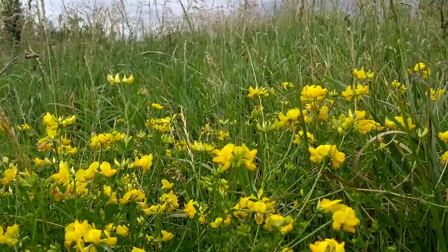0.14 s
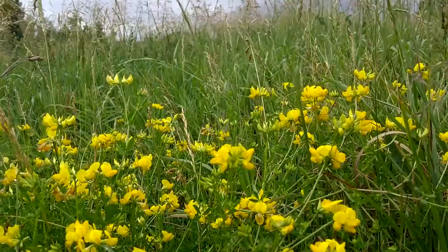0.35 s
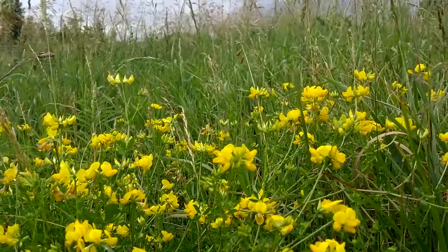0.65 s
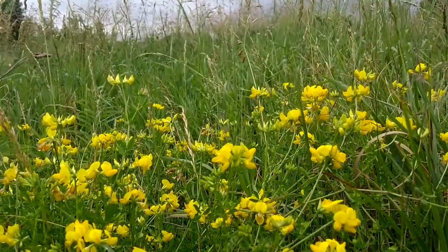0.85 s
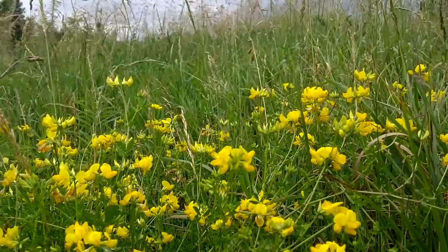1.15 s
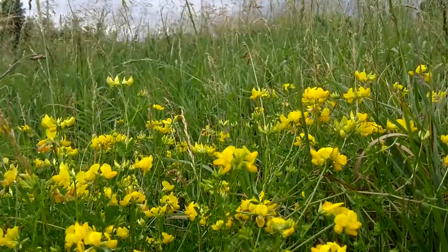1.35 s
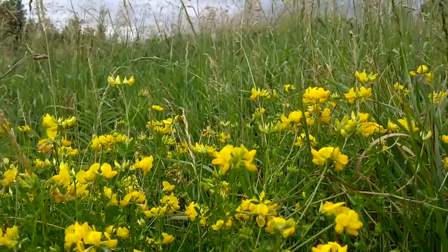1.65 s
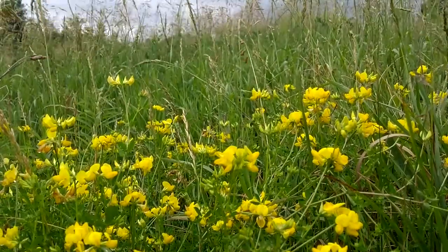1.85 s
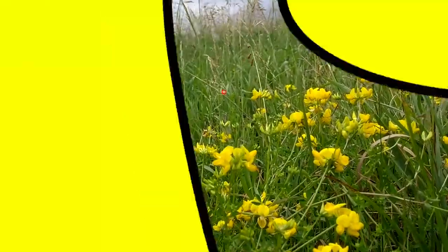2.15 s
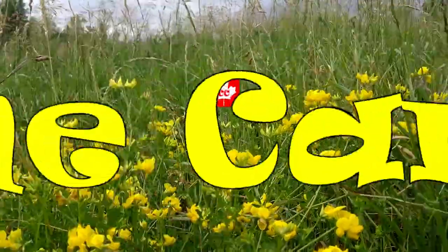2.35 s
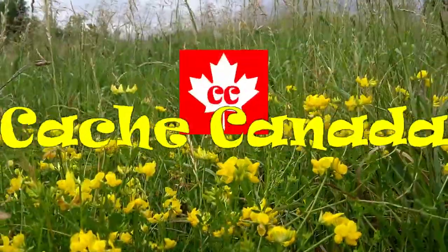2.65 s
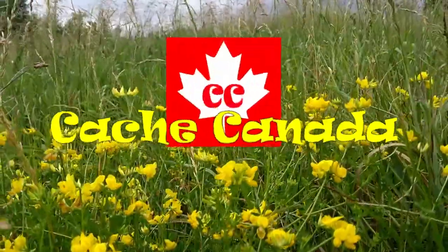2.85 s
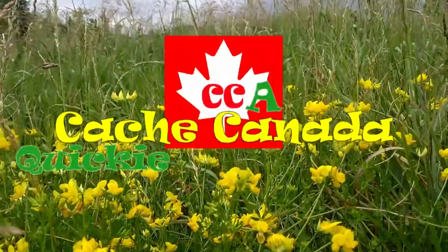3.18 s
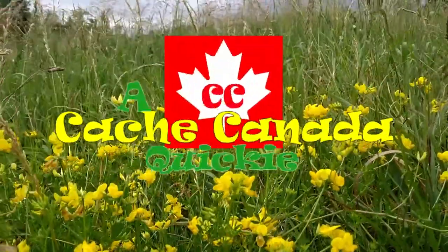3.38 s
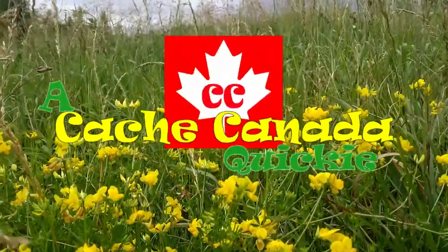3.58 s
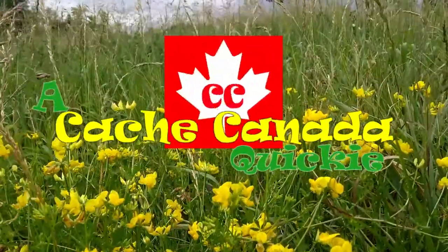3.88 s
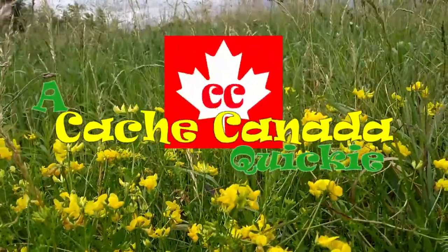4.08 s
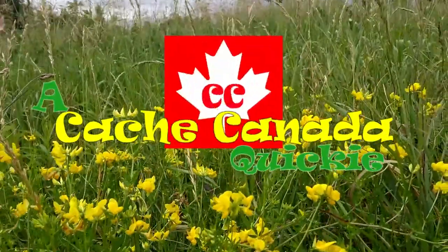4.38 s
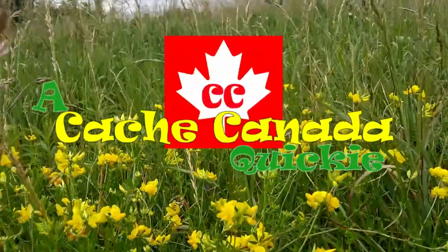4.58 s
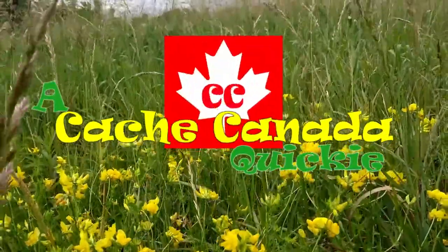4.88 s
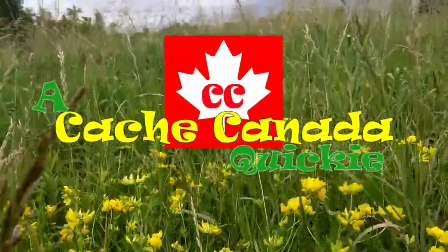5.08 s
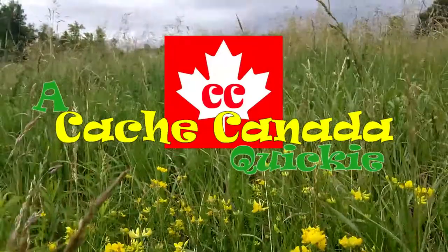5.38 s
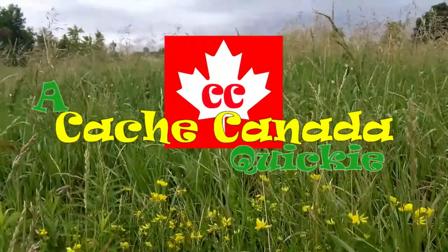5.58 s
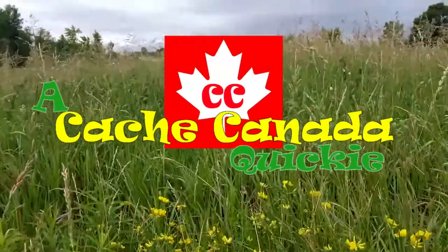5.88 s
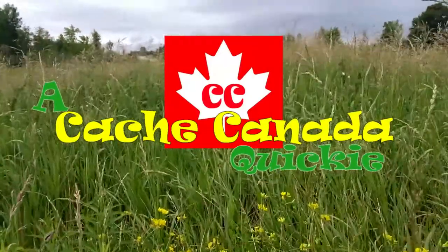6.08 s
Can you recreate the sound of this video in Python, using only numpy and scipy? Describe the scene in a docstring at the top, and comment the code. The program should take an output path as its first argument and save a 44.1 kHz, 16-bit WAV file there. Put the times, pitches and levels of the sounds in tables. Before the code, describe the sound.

Thin echoing bird whistles and faint chips, then loud wavering loon calls in a grassy field, with low wind buffeting near the end.

```python
"""Loon tremolo in a windy meadow

A loon gives three tremolo calls: a low reedy note breaks upward into a loud, pure warble.
Voices are overtones on gliding pitches; a second bird's thin falling whistles echo, small birds chip.
Gusts and single eddies, shaped noise and short pulses, buffet the microphone.
Behind them: hissing grass, ticking stems and a murmur (filtered noise), and a faint motor hum (sines)."""
import sys
import numpy as np
from scipy import signal
from scipy.fft import rfft, irfft
from scipy.io import wavfile
from scipy.ndimage import uniform_filter1d

SR = 44100
rng = np.random.default_rng(int(sys.argv[2]) if len(sys.argv) > 2 else 0)


def materialize(psi):
    """Save the field psi as 16-bit PCM at rate SR to the path in sys.argv[1].

    A 1-D psi becomes a single channel; in a 2-D psi each row is a channel.
    """
    bounded = np.clip(np.atleast_2d(psi).T, -1, 1)
    quanta = np.round(bounded * 32767).astype(np.int16)
    wavfile.write(sys.argv[1], SR, quanta)


N = 274743
T = np.arange(N) / SR


def undb(db):
    """Decibels to gain."""
    return 10 ** (np.asarray(db) / 20)


def unit(x):
    """Scale to rms 1."""
    return x / np.sqrt(np.mean(x ** 2))


def walk(rate_hz):
    """Random levels held 1 / rate_hz and slewed twice; spread near 1."""
    hold = max(int(SR / rate_hz), 1)
    levels = np.repeat(rng.standard_normal(N // hold + 1), hold)
    slewed = uniform_filter1d(uniform_filter1d(levels, hold), hold)
    return 1.6 * slewed[:N]


def noise(points):
    """Noise of rms 1 with a spectrum through (freq_hz, level_db) points."""
    hz, db = np.transpose(points)
    f = np.fft.rfftfreq(N, 1 / SR) + 1
    spectrum = undb(np.interp(np.log(f), np.log(hz), db))
    return unit(irfft(rfft(rng.standard_normal(N)) * spectrum, N))


def band(hz, width_hz):
    """Noise of rms 1 in one resonance with steep skirts."""
    f = np.fft.rfftfreq(N, 1 / SR) + 1
    resonance = 1 / (1 + ((f - hz ** 2 / f) / width_hz) ** 2)
    return unit(irfft(rfft(rng.standard_normal(N)) * resonance, N))


def stereo(mid, side, pan_db=0):
    """Left and right from what they share and what they do not."""
    left = (mid + side) * undb(pan_db / 2)
    right = (mid - side) * undb(-pan_db / 2)
    return np.array([left, right])


def delay(x, lag_s):
    """The same sound, later."""
    return np.interp(T - lag_s, T, x, left=0)


def gate(start_s, end_s, edge_s):
    """One between two times, with soft edges."""
    return np.sin(np.pi / 2 * np.clip(np.minimum(T - start_s, end_s - T) / edge_s, 0, 1)) ** 2


def bump(peak_s, width_s):
    """Gaussian rise to one and fall; width_s from the peak to 1/e."""
    return np.exp(-((T - peak_s) / width_s) ** 2)


def swing(times_s, values):
    """A curve that eases from one turning point to the next."""
    index = np.arange(len(times_s))
    place = np.interp(T, times_s, index)
    eased = np.floor(place) + np.sin(np.pi / 2 * (place % 1)) ** 2
    return np.interp(eased, index, values)


def syrinx(hz, gain, tone, throat=((1000, 0),), flutter_db=0):
    """A bird's voice: overtones on one gliding pitch, each fluttering and coloured by the throat."""
    out, on = np.zeros(N), gain > 0
    phase = 2 * np.pi * np.cumsum(hz[on]) / SR
    steps = np.arange(0, len(phase) + 1, SR // 250)
    for multiple, db in tone:
        wobble = np.interp(np.arange(len(phase)), steps, rng.standard_normal(len(steps)))
        flutter = flutter_db * (multiple > 1) * wobble  # the fundamental holds steady
        overtone_hz = multiple * hz[on]
        throat_db = np.interp(overtone_hz, *np.transpose(throat))
        colour = undb(db + flutter + throat_db) * (overtone_hz < SR / 2)
        out[on] += np.sqrt(2) * gain[on] * colour * np.sin(multiple * phase)
    return out


def glides(rows):
    """Short pure notes sliding in pitch: (start_s, length_s, first_hz, last_hz, level_db)."""
    out = 0
    for start, length, first, last, db in rows:
        slide_hz = np.interp(T, [start, start + length], [first, last])
        gain = undb(db) * gate(start, start + length, length / 2)
        out = out + syrinx(slide_hz * (1 + 0.016 * walk(750)), gain, [(1, 0.0046)])
    return out


HUM_START_S = 2.03
MURMUR_DB, MURMUR_RISE_DB = -59.5, 4.5  # rises as the hum sets in
HISS_START_DB, HISS_RISE_DB_PER_S = -57.5, 0.58
SWAY_PEAK_S, SWAY_WIDTH_S, SWAY_DB = 5.37, 0.47, 4  # extra hiss around the strongest gusts
# distant murmur spectrum: freq_hz, relative_db
MURMUR_SPECTRUM = [(25, -7), (45, -1), (70, 6), (130, 7), (220, 1), (400, -6.5), (800, -3.5), (1300, -3.5),
                   (1900, -11), (2400, -44.5), (4000, -38)]
# grass hiss spectrum: freq_hz, relative_db
HISS_SPECTRUM = [(1500, -2.5), (2300, -12.5), (2900, 0.5), (3700, 1), (4600, -13.5), (5900, 0.5),
                 (7200, -7.5), (8400, -1), (9500, -6.5), (10800, 2), (12200, -1.5), (13200, 7),
                 (14200, -3.5), (14800, -15.5)]


def meadow():
    """Distant murmur and hissing grass as shaped noise, with a brief soft rush."""
    murmur_db = MURMUR_DB + MURMUR_RISE_DB * gate(HUM_START_S, np.inf, 0.14) + 0.78 * walk(13)
    murmur = stereo(noise(MURMUR_SPECTRUM), undb(-24) * noise(MURMUR_SPECTRUM)) * undb(murmur_db)
    sway_db = SWAY_DB * bump(SWAY_PEAK_S, SWAY_WIDTH_S)
    hiss_db = HISS_START_DB + HISS_RISE_DB_PER_S * T + sway_db + 0.45 * walk(18)
    hiss = stereo(noise(HISS_SPECTRUM), undb(-0.5) * noise(HISS_SPECTRUM), pan_db=-2.0) * undb(hiss_db)
    rush = band(1220, 270) * undb(-54) * gate(0.83, 2.06, 0.95)
    return murmur + hiss + rush


# hum lines: freq_hz, level_db (before a common -0.5 dB trim)
HUM_LINES = [(360.7, -71), (419.9, -69), (538.3, -66.5), (597.5, -68.5), (689.1, -71.5), (899.0, -70),
             (1437, -75.5)]


def motors():
    """A far engine drones as narrow noise; then a hum of unsteady sines sets in."""
    drone = stereo(band(94.0, 9.1), undb(-22) * band(89, 7)) * undb(-57.0) * gate(0.54, 2.19, 0.46)
    hum = 0
    for hz, db in HUM_LINES:
        fading_db = 2.5 * walk(5)
        phase = 2 * np.pi * np.cumsum(hz + 1.317 * walk(14)) / SR
        hum = hum + undb(db + fading_db) * np.sqrt(2) * np.sin(phase)
    return drone + hum * undb(-.5) * gate(HUM_START_S, np.inf, 0.19)


# stem ticks near the microphone: start_s, level_db, centre_hz, decay_s
STEM_TICKS = [(2.178, -42.5, 1450, 0.0032), (2.978, -43.5, 3000, 0.0025), (3.896, -36, 707, 0.0057),
              (5.301, -50, 900, 0.0043)]


def stems():
    """Dry grass stems tick against each other: decaying bursts of band noise."""
    out = 0
    for start, db, hz, decay in STEM_TICKS:
        strike = undb(db) * (T > start) * np.exp(-np.abs(T - start) / decay)
        out = out + strike * stereo(band(hz, 1.5 * hz), undb(-2) * band(hz, 2.4 * hz))
    return out


CALM_DB = -55  # breeze between gusts
EDDIES_PER_S, EDDY_MAX_DB, EDDY_CENTRE_HZ = 9, 6, 105.3  # small eddies; level relative to the wind
PORT_LAG_S, PORT_PAN_DB = 0.00053, -1.6
PUSH_LIMIT = .6  # full scale 1
# gusts: peak_s, width_s (peak to 1/e), level_db
WIND_GUSTS = [(2.57, .14, -38.5), (3.1, .1, -51), (3.48, 0.058, -38), (4.85, .11, -40.5), (5.44, 0.1, -24),
              (5.72, 0.13, -29.5), (5.93, 0.17, -35)]
# big eddies that thump the microphone: peak_s, peak_db (before limiting), pitch_hz
BIG_EDDIES = [(2.465, -22.5, 119.7), (3.47, -18, 115), (5.254, -18.5, 135.7), (5.444, -6, 136),
              (5.621, -9.5, 123), (5.636, -15, 273), (5.65, -7, 90), (5.719, -2.5, 96.5), (5.778, -3, 147)]


def wind():
    """Turbulence pushes the two microphone ports in opposite ways; single eddies thump and puff."""
    shape = [(15, -44.5), (40, -3.5), (70, 4.5), (130, 0.5), (200, -11.5), (320, -20.5),
             (600, -46), (1500, -64.5), (5000, -79)]  # freq_hz, relative_db
    strength = undb(CALM_DB) + sum(undb(db) * bump(peak, width) for peak, width, db in WIND_GUSTS)
    gust = strength * undb(2 * walk(21))
    push, puff, shared = noise(shape) * gust, band(200, 400), noise(shape)

    eddies = [(peak, undb(db), hz) for peak, db, hz in BIG_EDDIES]
    for when, size, pitch in rng.random((round(EDDIES_PER_S * N / SR), 3)):
        gain = size * undb(EDDY_MAX_DB) * strength[int(when * N)]
        eddies.append((when * N / SR, gain, EDDY_CENTRE_HZ * 2 ** (pitch - .5)))
    ways = rng.choice([-1, 1], len(eddies))
    for (peak, gain, hz), way in zip(eddies, ways):
        near = slice(*np.searchsorted(T, [peak - 10 / hz, peak + 10 / hz]))
        cycles = (T[near] - peak) * hz
        thump = way * np.cos(2 * np.pi * cycles) + undb(-29) * puff[near]
        push[near] += gain * thump / (1 + (cycles / 0.59) ** 2) ** 2

    push = PUSH_LIMIT * np.tanh(push / PUSH_LIMIT)  # the diaphragms have only so much travel
    # an eddy reaches one port just before the other, so a little is common to both
    common = undb(-16.5) * gust * shared + (push - delay(push, PORT_LAG_S)) / 2
    return stereo(common, push, pan_db=PORT_PAN_DB)


SLIDE_HZ, SLIDE_HALF_S, SLIDE_STEEPNESS, SETTLE_HZ = 1790, .044, 2.6, 3364  # slide above the last note
SOFT_DB, OPEN_S, SWELL_S = -12, 0.042, .028  # soft start, then a swell as the bill opens
TSIP_S, TSIP_HZ, TSIP_RISE, TSIP_DB = .006, 4970, 1.36, -6.5  # upward flick; rise = last / first pitch
# whistle overtones: multiple, relative_db
WHISTLE_OVERTONES = [(1, 2), (2, -67), (3, -11)]
# bill response, a steep upper edge: freq_hz, gain_db
BILL_RESPONSE = [(6800, -1.5), (8500, 8), (10000, -0.5), (11200, -1.5), (12000, -6), (13000, -24)]


def whistle(start, length, level_db, fade_db_per_s, bright_db):
    """A flick, then a soft slide that swells and settles on one thin note."""
    end = start + length
    age_s = np.clip(T - start, 0, length)
    hz = SETTLE_HZ + SLIDE_HZ / (1 + (age_s / SLIDE_HALF_S) ** SLIDE_STEEPNESS)
    soft = undb(SOFT_DB + bright_db) * gate(start + TSIP_S, end, TSIP_S)
    full = (1 - undb(SOFT_DB)) * gate(start + OPEN_S, end, SWELL_S)
    shimmer_db = .9 * walk(120)
    gain = undb(level_db - fade_db_per_s * age_s + shimmer_db) * (soft + full)
    flick_db = level_db + TSIP_DB + bright_db
    flick = glides([(start, TSIP_S, TSIP_HZ, TSIP_HZ * TSIP_RISE, flick_db)])
    tone = WHISTLE_OVERTONES[:1] + [(k, db + bright_db) for k, db in WHISTLE_OVERTONES[1:]]
    return flick + syrinx(hz * (1 + .0012 * walk(300)), gain, tone, BILL_RESPONSE)


def trees(x, t60_s, ring_hz, width_hz):
    """Scattered echoes from the tree line: convolution with decaying band noise."""
    tail = band(ring_hz, width_hz) * undb(-60 * T / t60_s) * np.clip(T / 0.11, 0, 1)
    scale = np.sqrt(np.sum(tail ** 2) * SR / 2 / width_hz)
    return signal.fftconvolve(x, tail[:SR] / scale)[:N]


EAR_LAG_S, HELD_HZ = .00032, 3400
CHIP_S, CHIP_FALL = .054, .58  # fall = last / first pitch
# whistles: start_s, length_s, level_db (before overtones and bill), fade_db_per_s (negative grows), bright_db
WHISTLE_NOTES = [(0.508, 0.25, -28, 44.5, 2), (2.016, 0.24, -55, -37.5, -20),
                 (2.934, 0.21, -60.5, -24.5, -20), (3.963, 0.24, -33.5, 23, 1)]
# falling chips of small birds: start_s, first_hz, level_db
BIRD_CHIPS = [(0.897, 5130, -56), (1.025, 5140, -53), (1.49, 4510, -59), (1.604, 4700, -60),
              (2.646, 4830, -57), (2.765, 4600, -61), (2.885, 4800, -55), (3.018, 3580, -54.5),
              (3.348, 4400, -55.5)]
# slurs of other small birds: start_s, length_s, first_hz, last_hz, level_db
BIRD_SLURS = [(2.96, 0.096, 2450, 3030, -53), (3.854, 0.046, 6070, 5420, -56)]


def songbirds():
    """Whistles, chips and slurs from one side reach one ear later; the trees answer the whistles."""
    whistles = sum(whistle(*row) for row in WHISTLE_NOTES)
    chips = glides([(start, CHIP_S, hz, hz * CHIP_FALL, db) for start, hz, db in BIRD_CHIPS])
    direct = whistles + chips + glides(BIRD_SLURS)
    # only the held note carries to the tree line and back
    held_band = signal.butter(3, [HELD_HZ - 110, HELD_HZ + 110], "band", fs=SR, output="sos")
    held = signal.sosfilt(held_band, whistles)
    answer = undb(-10) * delay(held, .09) + undb(-21) * delay(held, .22)
    ring = trees(whistles, t60_s=1.1, ring_hz=HELD_HZ, width_hz=250) * undb(-18)
    scatter = trees(whistles, t60_s=0.36, ring_hz=4180, width_hz=3000) * undb(-13.5)
    haze = trees(whistles, t60_s=.6, ring_hz=4100, width_hz=700) * undb(-20)
    return np.array([delay(direct, EAR_LAG_S), direct]) + stereo(answer + ring + haze, scatter)


def far_loon():
    """Another loon holds one soft, sinking wail of three overtones."""
    hz = np.interp(T, [2.12, 2.4, 2.68], [695, 688, 655])
    return syrinx(hz, undb(-49.0) * gate(2.1, 2.7, 0.082), [(1, 0.5), (2, -12), (3, -20.5)])


THROB_MAX_S = .11


def throbs(rows, jitter, fullness):
    """Tremolo: pitch and strength sink together between crests; a full voice dwells on the crests."""
    crest_s, hz, db, sag, dip_db = np.transpose(rows)
    gap = np.diff(crest_s, prepend=-np.inf, append=np.inf)
    half = np.minimum(gap, THROB_MAX_S) / 2
    turns = np.column_stack([crest_s - half[:-1], crest_s, crest_s + half[1:]]).ravel()
    joined = gap[:-1] < 2 * THROB_MAX_S  # rises out of the trough before

    def sink(trough):
        before = np.where(joined, np.roll(trough, 1), trough)
        return swing(turns, np.column_stack([before, np.ones(len(crest_s)), trough]).ravel())

    pulse = sink(undb(dip_db * fullness)) ** (1 / fullness)
    pitch_hz = swing(crest_s, hz) * sink(1 - sag) * (1 + jitter * walk(600))
    return pitch_hz, undb(swing(crest_s, db)) * pulse


ONSET_S, SWITCH_S = 0.025, .0045  # calls open and close gently; registers switch at once
REEDY_DB, REEDY_GROWTH = -18, .25  # low overtones thin out below this level
BREAK_RASP_DB, BREAK_S = -32, .008  # rasp where the voice breaks upward
SQUEAK_S, SQUEAK_RISE = .042, 1.24  # rise = last / first pitch
CEILING_DB, KNEE = -5.0, 16
# calls: start_s, break_up_s, drop_back_s, end_s, harshness_db (high overtones)
CALLS = [(2.287, 2.406, 2.735, 2.81, -3.5), (4.353, 4.473, 4.897, 4.968, -2.5), (6, 6.101, 6.3, 6.35, 4.5)]
# low register tremolo: crest_s, pitch_hz, level_db, sag_share (pitch), dip_db (level)
LOW_CRESTS = [(2.349, 779, -16.5, 0.12, -9), (2.408, 832, -16.5, .05, -8), (2.765, 644.5, -35, 0.031, -7),
              (4.376, 712.4, -21.5, .165, -7), (4.467, 839, -18, 0.045, -8.5),
              (4.925, 637.5, -37.5, 0.017, -9), (6.034, 739.7, -21.5, 0.11, -4),
              (6.106, 816, -21.5, 0.046, -8)]
# high register tremolo: crest_s, pitch_hz, level_db, sag_share, dip_db
HIGH_CRESTS = [(2.421, 1309, -4.5, .12, -18.5), (2.512, 1306, -5.5, 0.12, -23),
               (2.608, 1259, -7.5, 0.1, -21), (2.698, 1200, -17.5, 0.12, -24.5),
               (4.472, 1190, -6, 0.27, -12), (4.551, 1170, -5.5, 0.0026, -9.5),
               (4.567, 1297, -6, .14, -22.5), (4.654, 1308, -5, 0.14, -28.5), (4.75, 1285, -6.5, .21, -43),
               (4.843, 1063, -11.5, .25, -28.5), (6.121, 1311, -5, 0.11, -17),
               (6.208, 1319, -4.5, .11, -13)]
# low register overtones: multiple, relative_db
LOW_OVERTONES = [(1, -2.5), (2, -5.5), (3, -29), (4, -34), (5, -30), (6, -36.5), (7, -43.5), (8, -51.5),
                 (9, -41)]
# high register overtones above the fundamental: multiple, relative_db
HIGH_OVERTONES = [(2, -40), (3, -44.5), (4, -44), (5, -60.5), (6, -62), (7, -65.5)]
# throat and open bill response, high overtones: freq_hz, gain_db
THROAT_RESPONSE = [(1700, 1), (2100, 7.5), (2450, -1.5), (2620, 1), (3300, 1.5), (4000, -2.5), (4550, 6.5),
                   (5100, -25.5), (6300, 0), (7500, 17.5), (9000, 8.5)]
# rising squeaks as the voice catches: start_s, first_hz, level_db
CATCH_SQUEAKS = [(2.245, 1054, -41), (2.258, 781, -37.5), (4.338, 870, -45.5), (4.789, 673, -31),
                 (5.977, 841, -44)]


def loon():
    """Two registers, rasping at the breaks; the loudest crests overload and gain odd overtones."""
    low, high = 0, 0
    for start, up, down, end, _ in CALLS:
        low = low + gate(start, end, ONSET_S) * (1 - gate(up - SWITCH_S / 2, down, SWITCH_S))
        high = high + gate(up, down + SWITCH_S, SWITCH_S)
    starts, ups, _, _, harsh_db = np.transpose(CALLS)
    harsh = undb(harsh_db[np.maximum(np.searchsorted(starts, T) - 1, 0)])
    voice = glides([(start, SQUEAK_S, hz, hz * SQUEAK_RISE, db) for start, hz, db in CATCH_SQUEAKS])

    hz, gain = throbs(LOW_CRESTS, jitter=0.0079, fullness=.7)
    reedy = (gain / undb(REEDY_DB)) ** REEDY_GROWTH
    voice = voice + syrinx(hz, gain * low, LOW_OVERTONES[:1])
    voice = voice + syrinx(hz, gain * low * reedy, LOW_OVERTONES[1:], flutter_db=1.5)

    hz, gain = throbs(HIGH_CRESTS, jitter=0.0054, fullness=0.48)
    # the throat lifts the fundamental on each crest; the overtones swell far less
    overtone_gain = (gain * high) ** 0.61 * harsh
    voice = voice + syrinx(hz, gain * high, [(1, 0)])
    voice = voice + syrinx(hz, overtone_gain, HIGH_OVERTONES, THROAT_RESPONSE, flutter_db=5)

    breaks = sum(np.exp(-np.abs(T - up - SWITCH_S) / BREAK_S) for up in ups)
    rasp = undb(-37.0) + undb(BREAK_RASP_DB) * breaks
    voice = voice * (1 + rasp * band(400, 830))
    voice = voice + undb(-31) * delay(voice, 0.028)  # off the water
    voice = voice / (1 + np.abs(voice / undb(CEILING_DB)) ** KNEE) ** (1 / KNEE)
    # the overload has a bright edge
    shrill = signal.sosfilt(signal.butter(4, 7000, "high", fs=SR, output="sos"), voice)
    voice = voice * (1 + undb(-14) * rasp * band(3000, 6000))
    return voice + undb(-7.5) * shrill


def scene():
    """All sources together; the loons are straight ahead."""
    return meadow() + motors() + stems() + wind() + songbirds() + far_loon() + loon()


TOP_HZ, FADE_IN_S = 15200, 0.23


def record(dry):
    """The sound fades in and the top is cut."""
    fade = np.clip(T / FADE_IN_S, 0, 1)
    return signal.sosfilt(signal.ellip(8, .2, 70, TOP_HZ, fs=SR, output="sos"), dry * fade)


dry = scene()
out = record(dry)
materialize(out)
```